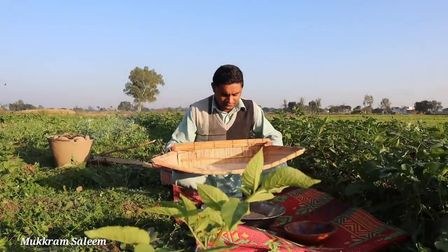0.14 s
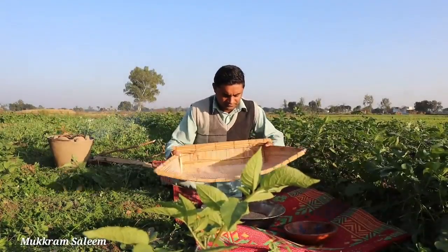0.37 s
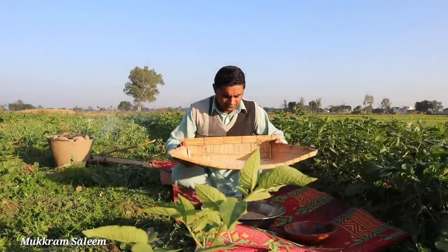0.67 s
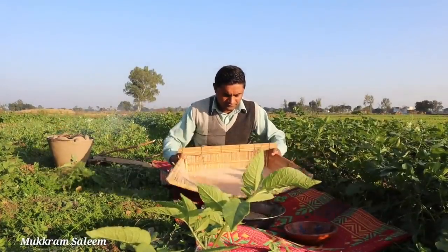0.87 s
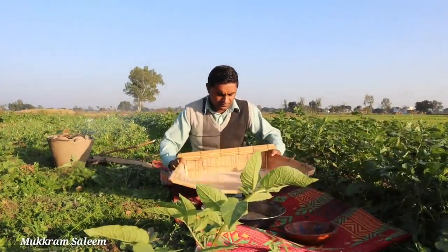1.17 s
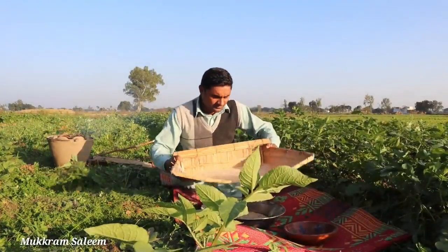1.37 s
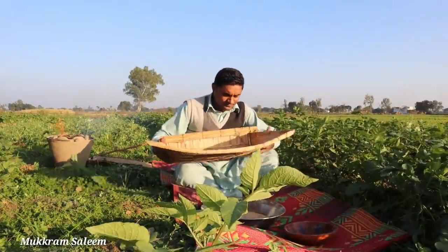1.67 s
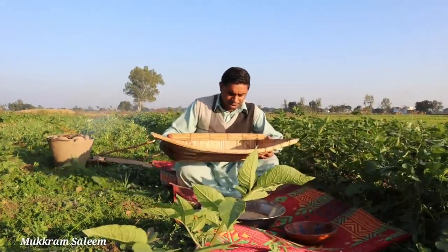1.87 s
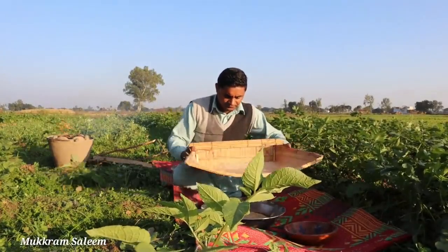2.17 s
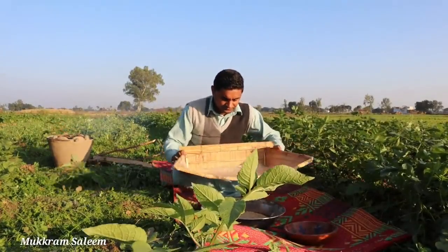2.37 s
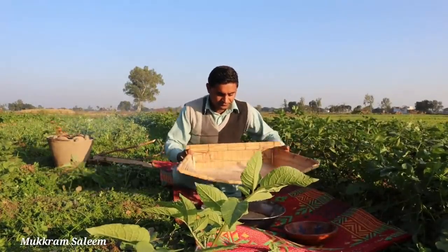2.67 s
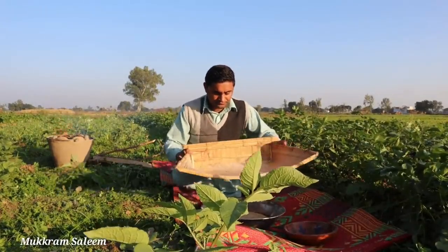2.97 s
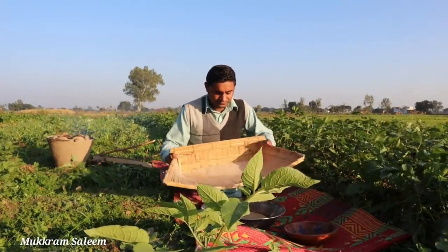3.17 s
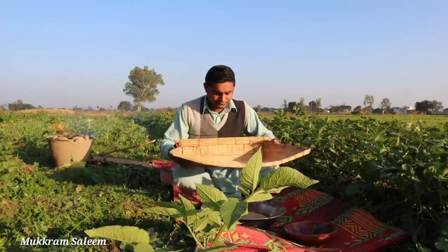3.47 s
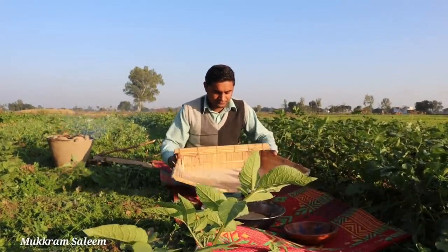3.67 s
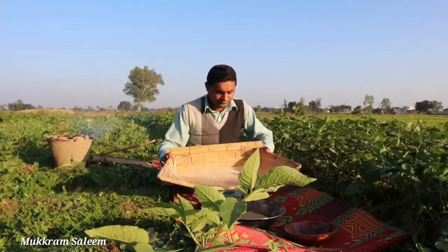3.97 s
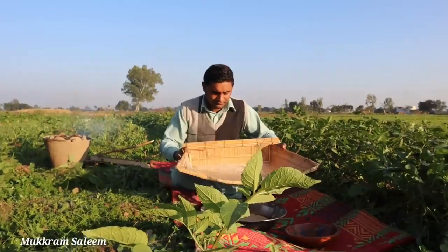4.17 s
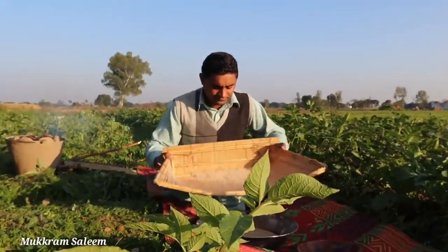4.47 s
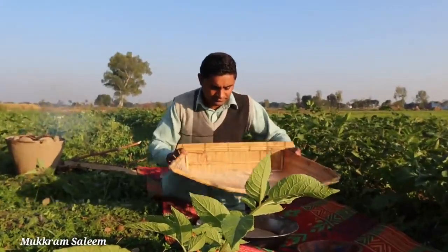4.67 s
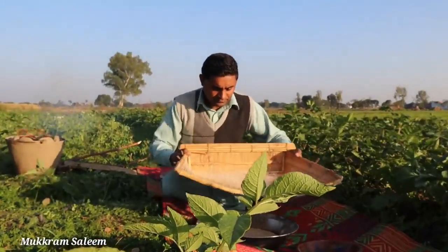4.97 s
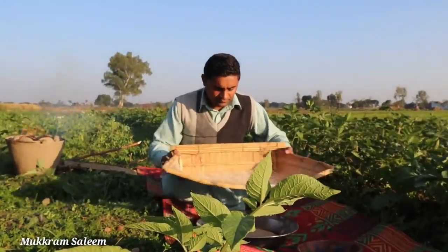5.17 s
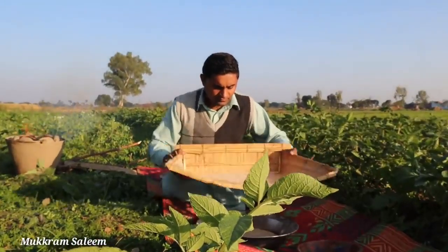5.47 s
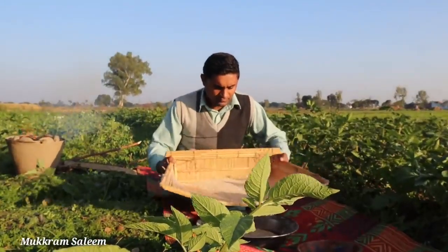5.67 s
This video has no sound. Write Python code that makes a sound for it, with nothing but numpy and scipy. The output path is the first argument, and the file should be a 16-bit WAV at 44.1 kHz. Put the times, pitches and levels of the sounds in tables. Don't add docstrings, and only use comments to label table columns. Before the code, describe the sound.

Close up in an open field, coarse grain slides to and fro in a woven tray, about seven brisk hissing strokes a second. Knuckles tap, then the shaking stops for a sharp flat-handed slap and scattered kernel clicks. It resumes, pauses for two softer slaps, and finishes with the strongest shaking. Wind thumps a single microphone; leaves rustle faintly and far birds peep.

```python
import sys
import numpy as np
from scipy import signal
from scipy.fft import rfft, irfft, next_fast_len
from scipy.io import wavfile
from scipy.ndimage import uniform_filter1d

SR = 44100
rng = np.random.default_rng(int(sys.argv[2]) if len(sys.argv) > 2 else 0)


def voltage_ratio(level):
    return 10 ** (np.asarray(level, float) / 20)


def to_wav(s):
    ch = np.atleast_2d(s).T
    pcm = np.round(np.clip(ch, -1, 1) * 32767)
    wavfile.write(sys.argv[1], SR, pcm.astype(np.int16))


N = 257086


def unit(x):
    return x / np.sqrt(np.mean(x ** 2))


def peak(x):
    return x / np.abs(x).max()


def smooth_twice(x, span):
    return uniform_filter1d(uniform_filter1d(x, span), span)


def colour(x, shape, causal=False):
    hz, db = np.transpose(shape)
    size = 2 * next_fast_len(N // 2 + 1)
    f = np.arange(size // 2 + 1) * SR / size + 1
    gain = voltage_ratio(np.interp(np.log(f), np.log(hz), db, left=-90, right=-90))
    if causal:
        cepstrum = irfft(np.log(gain), size)
        cepstrum[1:size // 2] *= 2
        cepstrum[size // 2 + 1:] = 0
        gain = np.exp(rfft(cepstrum))
    return unit(irfft(rfft(x, size) * gain, size)[:N])


def ring(x, hz, t60):
    pole = np.exp(2j * np.pi * hz / SR - np.log(1000) / (t60 * SR))
    return signal.lfilter([1], [1, -pole], x + 0j).imag


def walk(rate):
    hold = int(SR / rate)
    steps = np.repeat(rng.standard_normal(N // hold + 1), hold)
    return unit(smooth_twice(steps, hold)[:N])


def both(a_db, b_db):
    return 10 * np.log10(voltage_ratio(a_db) ** 2 + voltage_ratio(b_db) ** 2)


def swells(s, peak_db, rise_s, fall_s, bend=1):
    t = np.arange(0, N + 32, 32) / SR
    power = 1e-9
    for at, db, up, down in np.broadcast(s, peak_db, rise_s, fall_s):
        away = np.maximum(at - t, 0) / max(up, .002) + np.maximum(t - at, 0) / max(down, .002)
        power = power + voltage_ratio(db - 10 * away ** bend) ** 2
    return np.interp(np.arange(N) / SR, t, 10 * np.log10(power))


# frequency in Hz, density in dB per Hz.
FIELD_COLOUR = [(18, -37), (30, -14.5), (69, -2), (208, -16), (341, -3.5), (898, -14.5), (1230, -7.5),
                (1770, -14), (3780, -18), (4540, -21), (15500, -33.5)]


def field():
    return colour(rng.standard_normal(N), FIELD_COLOUR) * voltage_ratio(-48.4 + 1.6 * walk(4.4))


# frequency in Hz, density in dB per Hz.
EDDY_COLOURS = [
    [(15, 5), (30, -0.5), (60, 5.5), (85, 1), (100, -17)],
    [(70, -30), (90, 1.5), (125, 2.5), (160, -10.5), (190, -52)],
    [(135, -13), (165, 3), (220, -2.5), (300, -7.5), (500, -25)],
]
CALM_DB = (-53, -55, -55.5)
# peak time in seconds, peak in dB, rise in seconds per 10 dB, fall in seconds per 10 dB.
LARGE_GUSTS = [(0.071, -38.5, -0.1, 0.009), (0.524, -17.7, 0.012, 0.07), (0.834, -43, 0.326, 0),
               (1.615, -45, 0.224, -0.1), (2.686, -37.2, 0.016, 0.099), (2.951, -23, 0.05, 0.058),
               (3.073, -32.5, 0.004, 0.05), (3.149, -30.5, 0.014, 0.063), (3.527, -69, 0.384, 0.014),
               (3.705, -25.5, 0.1, 0.022), (3.923, -23.5, 0.1, 0.04), (3.983, -32.5, 0.1, 0.051),
               (4.094, -29, 0.013, 0.016), (4.254, -34.3, 0.108, 0.01), (4.302, -27, 0.022, 0.076),
               (4.441, -29, 0.023, 0.08), (4.624, -37, 0.022, 0.036), (4.74, -44, 0.053, 0),
               (4.869, -28.4, 0.03, 0.1), (5.194, -39.1, -0.05, 0.172), (5.434, -35.6, 0.208, 0.06)]
MIDDLE_GUSTS = [(0.053, -43.8, 0.032, 0.156), (0.403, -45.3, 0.12, 0.069), (0.521, -34, 0.008, 0.063),
                (0.809, -29, 0.019, 0.008), (0.89, -43.9, 0.109, 0.173), (1.614, -41.4, 0.027, 0.032),
                (1.89, -45.4, 0.079, 0.097), (2.39, -47.5, 0.149, 0.191), (2.686, -40.5, 0.032, 0.09),
                (2.953, -38, 0.024, 0.038), (3.168, -32.5, 0.066, 0.047), (3.492, -36, 0.015, 0.085),
                (3.616, -22.5, 0.034, 0.021), (3.652, -22, 0.0074, 0.012), (3.678, -20, 0.016, 0.025),
                (3.708, -25, 0.012, 0.015), (3.813, -21.5, 0.008, 0.03), (3.832, -20, 0.02, 0.017),
                (3.865, -30.5, 0.02, 0.05), (4.059, -30.5, 0.035, 0.062), (4.3, -22.5, 0.044, 0.025),
                (4.407, -32.2, 0.079, 0.004), (4.464, -27.7, 0.029, 0.082), (4.797, -33, 0.018, 0.106),
                (4.911, -37.1, 0.051, 0.013), (5.21, -48.4, 0.478, 0.53), (5.542, -36.5, 0.212, 0.03)]
SMALL_GUSTS = [(0.34, -49.5, 0.364, 0.36), (0.801, -43.5, 0.016, 0.071), (0.923, -32.1, 0.013, 0.021),
               (1.016, -42.2, 0.017, 0.017), (1.864, -42, 0.004, 0.041), (2.014, -44, 0.035, 0.004),
               (2.458, -40.5, 0.065, 0.009), (2.904, -47, 0.017, 0.207), (3.529, -54, 0.568, 0.008),
               (3.672, -24.6, 0.075, 0.015), (3.817, -31.9, 0.057, 0.034), (3.949, -48.5, 0.007, 0.075),
               (4.044, -37.5, 0.012, 0.046), (4.389, -47, 0.255, 0.517), (4.804, -27, 0.01, 0.069),
               (4.885, -48.1, 0.024, 0.6), (5.472, -50, 0.548, 0.312)]


def wind():
    out = 0
    gusts = LARGE_GUSTS, MIDDLE_GUSTS, SMALL_GUSTS
    for rows, calm_db, shape, span_s in zip(gusts, CALM_DB, EDDY_COLOURS, (.06, .035, .022)):
        swirl = colour(rng.standard_normal(N), shape)
        swing = np.sqrt(smooth_twice(swirl ** 2, int(span_s * SR)))
        steady = unit(swirl / swing ** .7)
        level_db = both(swells(*np.transpose(rows)), calm_db + 3 * walk(8))
        out = out + voltage_ratio(level_db) * steady
    crests = out ** 2 - uniform_filter1d(out ** 2, SR // 40)
    return out + 1.2 * crests


# time in seconds, rattle in dB, time to sink 10 dB in seconds.
SHAKE_STROKES = [(0.062, -32, 0.0769), (0.19, -33.5, 0.06), (0.303, -33, 0.06), (0.427, -32.5, 0.07),
                 (0.531, -33.5, 0.056), (0.651, -37, 0.0834), (2.334, -34, 0.0827), (2.483, -34, 0.0675),
                 (2.624, -35.5, 0.076), (2.769, -32.5, 0.07), (2.904, -32, 0.07), (3.054, -32.5, 0.09),
                 (3.183, -33.5, 0.0739), (3.304, -33, 0.0634), (3.393, -37, 0.107), (4.332, -33, 0.0832),
                 (4.472, -31.5, 0.08), (4.607, -31, 0.0746), (4.744, -29.5, 0.0732), (4.875, -31, 0.0651),
                 (5.008, -29.5, 0.0634), (5.137, -28.5, 0.0642), (5.27, -30, 0.0559), (5.398, -30.0, 0.059),
                 (5.527, -31, 0.069), (5.655, -31.5, 0.064), (5.774, -34.5, 0.12)]
# time in seconds, rattle in dB,
# rise in seconds per 10 dB, fall in seconds per 10 dB, chaff over its usual level in dB.
LOOSE_SLIDES = [(0.787, -45, -0.2, 0.07, -1), (0.955, -34.8, 0.06, 0.067, 1.0),
                (1.011, -38.5, 0.1, 0.048, -0.7), (1.12, -48, 0, 0.066, -5),
                (1.271, -38.5, 0.035, 0.052, -0.4), (1.434, -52.5, 0, 0.1, 5),
                (1.556, -50.5, -0.06, 0.2, -6.7), (1.629, -46.0, 0.012, 0.139, 1.9),
                (1.714, -39, 0.076, 0.028, 2), (1.807, -46.0, 0.107, 0, -2.1),
                (1.868, -45.5, 0.015, 0.164, -0.2), (1.917, -51, 0.016, 0.036, 1.5),
                (2.053, -44.3, -0.03, 0.02, -5.8), (2.12, -41.6, -0.01, 0.17, -4),
                (2.163, -44.5, 0.02, 0.16, 4.5), (3.574, -44.0, 0, 0.03, 0), (3.63, -48, 0.3, 0.195, -0.5),
                (3.758, -29.5, 0.03, 0.04, 1.5), (3.853, -45.5, -0.1, 0.097, -2),
                (3.975, -50.0, -0.1, 0, 2), (4.051, -41, -0.02, 0.4, -0.6), (4.148, -42, 0.02, -0.3, 1.3)]
# time in seconds, thrum in dB, reed ring in dB, length in seconds per 10 dB.
SLUMPING_CLUMPS = [(0.067, -40, -46.5, 0.07), (0.556, -34, -38, 0.03), (0.8, -49, -36, -0.06),
                   (0.921, -33, -32.5, 0.02), (1.025, -42, -39, 0.01), (1.27, -38, -36, -0.02),
                   (1.7, -41.5, -41, 0.04), (1.874, -46, -55, -0.06), (2.586, -39, -53, 0),
                   (2.64, -55, -37.5, 0), (2.74, -51, -39, -0.01), (3.364, -52, -35, 0.02),
                   (3.44, -51, -36, 0.03), (3.565, -42, -37.5, 0.03), (3.657, -37.5, -42, 0.09),
                   (3.814, -40, -62, 0.07), (4.274, -41, -44, .025), (4.328, -37.5, -31, 0.0457),
                   (4.489, -41, -35, 0.06), (4.772, -40, -43, 0.12), (4.916, -47, -50, 0.27),
                   (5.01, -48, -34, 0.1), (5.532, -42.5, -41, 0.1)]


def motion():
    s, db, width = np.transpose(SHAKE_STROKES)
    shaken = swells(s, db + 1.5, .97 * width, width, bend=2.2)
    s, db, rise, fall, chaffy_db = np.transpose(LOOSE_SLIDES)
    rattle_db = both(shaken, swells(s, db, rise, fall))
    chaff_drive_db = both(shaken, swells(s, db + chaffy_db, rise, fall))
    chaff_db = -36.4 + 1.03 * (chaff_drive_db + 31.5)
    push = uniform_filter1d(rattle_db, int(.026 * SR)) + 32.5
    s, floor_db, cane_db, length = np.transpose(SLUMPING_CLUMPS)
    reed_db = both(-36 + .85 * push, swells(s, cane_db, length, length))
    thrum_db = both(-45.5 + .61 * push, swells(s, floor_db, length, length))
    return chaff_db, rattle_db, reed_db, thrum_db


def kernels(per_s, spread_db, hiss):
    when, size, sign = rng.random((3, N))
    ticks = (when < per_s / SR) * voltage_ratio(-spread_db * np.log(size + .05)) * np.sign(sign - .5)
    return unit(ticks) + hiss * rng.standard_normal(N)


# frequency in Hz, density in dB per Hz.
RATTLE_COLOUR = [(1500, -70), (1850, -12), (2600, -3.5), (3550, -0.5), (4100, -2.5), (4550, -16),
                 (4800, -11.5), (5300, -26.5)]
CHAFF_COLOUR = [(4500, -43), (5200, -10.5), (6200, -6), (7500, -3), (10000, -5), (12500, -14.5),
                (15500, -22.5), (17000, -40)]
REED_COLOUR = [(700, -14), (900, -8.5), (1300, -1), (1560, 0), (1720, -6), (1900, -14.5), (2300, -16)]
THRUM_COLOUR = [(150, -35), (260, -4.5), (360, 0.5), (600, 1.5), (870, -9.5), (1100, -14)]


def grain():
    chaff_db, rattle_db, reed_db, thrum_db = motion()
    coarse = kernels(per_s=5000, spread_db=2, hiss=1.3)
    fine = kernels(per_s=9000, spread_db=2, hiss=1.3)
    heavy = coarse + 1.1 * kernels(per_s=140, spread_db=3, hiss=0)
    rattle = voltage_ratio(rattle_db) * colour(coarse, RATTLE_COLOUR, causal=True)
    chaff = voltage_ratio(chaff_db) * colour(fine + .5 * coarse, CHAFF_COLOUR, causal=True)
    reeds = voltage_ratio(reed_db + 1.25 * walk(30.01)) * colour(heavy + coarse, REED_COLOUR, causal=True)
    thrum = voltage_ratio(thrum_db + 1.3 * walk(25.01)) * colour(heavy, THRUM_COLOUR, causal=True)
    return (rattle + chaff + reeds + thrum) * voltage_ratio(.91 * walk(60))


# frequency in Hz, level in dB, decay by 60 dB in seconds.
TRAY_MODES = [(355, -9, 0.013), (726, -10, 0.043), (1000, 5.5, 0.0062), (1520, 3, 0.024)]
CRACK_MODES = [(2400, -6.5, 0.012), (3030, -2.5, 0.0061), (3600, 3.5, 0.0073), (4030, -7.5, 0.009),
               (7450, -1.5, 0.0023)]


def struck_tray(blows):
    size = 2048
    out, t = np.zeros(N + size), np.arange(size) / SR
    air = signal.butter(2, 11000, fs=SR, output="sos")
    soft = signal.butter(2, 6000, fs=SR, output="sos")
    for s, peak_db, hz, crack_db, share in blows:
        share = max(share, .15)
        noise = rng.standard_normal(size)
        push = np.sin(np.pi * np.clip(t * hz * 2, 0, 1)) ** 2
        scrape = .15 * noise * np.exp(-t / .002)
        body = peak(ring(push + scrape, hz, .024 * share))
        for f, db, t60 in TRAY_MODES:
            distance_db = 2.7 * abs(np.log2(f / hz))
            body = body + voltage_ratio(db - 9 - distance_db) * peak(ring(push, f, t60 * share))
        if hz < 2000:
            body = signal.sosfilt(soft, body)
        burst = noise * t * np.exp(-t / .001)
        crack = sum(voltage_ratio(db) * ring(burst, f, t60) for f, db, t60 in CRACK_MODES)
        crack = peak(signal.sosfilt(air, crack))
        i = int(s * SR)
        out[i:i + size] += voltage_ratio(peak_db) * (peak(body) + voltage_ratio(crack_db) * crack)
    return signal.sosfilt(signal.butter(2, 240, "high", fs=SR, output="sos"), out[:N])


# time in seconds, peak in dB,
# strongest ring in Hz, crack over ring in dB, decay as a share of the usual.
TAPS = [(.226, -20, 1120, -14, .95), (.337, -18, 1500, -12.5, 0.15), (.456, -19, 1140, -10, 1.4),
        (.549, -29, 494, -14, .67), (.791, -29, 706, -20, 0.84), (.802, -25, 685, -14, 1.1),
        (.9165, -15, 513, -16, 0.25), (.9605, -15.5, 1500, -10, .26), (1.162, -33, 900, -3.5, .7),
        (1.478, -26, 1200, -27, 0.9), (1.559, -27, 660, -9, .67), (1.785, -27, 1180, -14, 1.1),
        (1.860, -27, 930, -6, .7), (1.880, -26.5, 1250, -9, 0.55), (1.908, -27.5, 920, -5, .55),
        (2.103, -35, 1240, -9, .6), (3.3585, -16, 1430, -5, 0.73), (4.684, -16, 1000, -18, .23),
        (5.577, -22, 603, -6, .44), (5.605, -18.5, 1200, -23, 0.77)]


def taps():
    return struck_tray(TAPS)


# time in seconds, peak in dB, # strongest ring in Hz, crack
# over ring in dB, decay as a share of the usual.
KERNEL_TICKS = [(.3686, -24, 3450, -2, .5), (.9353, -28, 3240, -4, .5), (1.1194, -40, 3010, -4, .5),
                (1.4027, -39, 3790, -4, .5), (1.6184, -42, 3380, -4, .5), (1.6257, -39, 4040, -4, .5),
                (1.7863, -40, 2700, -4, .5), (1.8647, -37, 3430, -4, .5), (1.9899, -39, 2770, -4, .5),
                (2.0477, -37, 3200, -4, .5), (2.1046, -35, 3550, -4, .5), (2.7062, -28, 3280, -4, .5),
                (2.9931, -26, 3700, -4, .5), (3.7344, -32, 1400, -6, .6), (3.9464, -42, 3510, -4, .5),
                (4.2373, -31, 3780, -5, .5), (4.2542, -31, 3870, -4, .5), (4.4084, -22, 3180, -4, .5),
                (4.9501, -25, 3890, -4, .5), (5.0379, -21, 3930, -3.5, .5), (5.7344, -25, 3670, -4, .5),
                (1.7105, -33, 2740, -10, .7), (3.556, -25, 1280, -20, 0.87), (3.596, -25, 650, -20, .6),
                (3.668, -25, 950, -20, .5)]


def kernel_ticks():
    return struck_tray(KERNEL_TICKS)


# time in seconds, peak in dB, # strongest ring in Hz, crack over
# ring in dB, decay as a share of the usual.
STRAY_KERNELS = [(.8035, -36, 9000, -10, .2), (.908, -25, 2400, -6, .5), (1.427, -39, 7050, -4, .35),
                 (1.436, -39, 3840, 0, .5), (1.712, -28, 3600, 2, .6), (1.934, -32, 4120, -1, .8),
                 (2.0572, -35, 8540, -12, .15), (2.121, -30, 10000, -8, .2), (3.554, -27, 2400, -10, .8),
                 (3.56, -21.5, 2300, -6, .79), (3.819, -26, 4070, -5, 0.71), (3.870, -34, 4220, 2, .8),
                 (3.912, -38, 4000, 4, 0.54), (3.975, -38, 3600, 0.5, .4)]


def stray_kernels():
    return struck_tray(STRAY_KERNELS)


# time in seconds,
# peak in dB, strongest ring in Hz, crack over ring in dB, decay as a share of the usual.
FINGER_BLOWS = [(1.2419, -19.5, 3700, 2, 0.84), (1.2442, 1.5, 1000, -17, 0.38), (1.2456, -9, 369, -15, 1.5),
                (1.2558, -24, 1520, 1, 0.56), (1.2564, -9, 1520, -17.5, 0.45),
                (1.258, -14.5, 352, -22, 0.91), (3.7467, -18.5, 3470, -1, 0.77),
                (3.7485, -11.5, 655, -19, 0.78), (3.7535, -15, 430, -6, 2.7),
                (3.7575, -8.5, 1610, -10, 0.38), (3.7602, -10, 644, -17, 0.6),
                (4.0447, -21, 1530, -2, 0.57), (4.048, -10, 1560, -12, 0.58), (4.0496, -10, 640, -25, 0.89),
                (4.0533, -9, 1550, -10, 0.57), (4.055, -9, 440, -21, 0.33), (1.243, -29, 8500, -6, .4),
                (1.2505, -19, 1150, -6, .6)]


def slaps():
    return struck_tray(FINGER_BLOWS)


# time in seconds, peak in dB, strongest ring in
# # Hz, crack over ring in dB, decay as a share of the usual.
MORE_FINGER_BLOWS = [(1.2457, -6, 1490, -20, 0.47), (1.2551, -17, 1500, -15, .4), (1.2571, -8.5, 1550, -20, .4),
                (1.269, -25, 400, -8, 1), (3.7521, -19, 1450, -10, .5), (3.7562, -17, 1550, -15, 0.35),
                (3.7581, -10, 1600, -8, 0.4), (3.7685, -22, 600, -5, 0.7), (3.772, -24, 1500, -10, .8),
                (3.781, -24, 1300, -15, .6), (4.046, -18, 1550, -10, .4), (4.0493, -8.5, 1570, -19, 0.39),
                (4.0547, -11, 1560, -12, .45), (4.0585, -22, 450, -10, .6),
                (4.051, -15, 1050, -15, .6),
    (3.7594, -14, 600, -15, .5),
    (4.0572, -17, 1100, -12, .6),
]


def more_finger_blows():
    return struck_tray(MORE_FINGER_BLOWS)


# start in seconds, length in seconds, start in Hz, end in Hz, level in dB.
BIRD_PEEPS = [
    (1.530, .068, 2340, 2080, -50),
    (1.722, .05, 5200, 5050, -57),
    (3.853, .045, 4700, 4600, -57),
]


def birds():
    out, t = 0, np.arange(N) / SR
    for s, length, start_hz, end_hz, db in BIRD_PEEPS:
        u = np.clip((t - s) / length, 0, 1)
        phase = 2 * np.pi * np.cumsum(start_hz + (end_hz - start_hz) * u) / SR
        out = out + voltage_ratio(db) * np.sin(np.pi * u) * np.sin(phase)
    return out * voltage_ratio(4.7 * walk(100))


def scene():
    mono = field() + wind() + grain()
    mono = mono + taps() + kernel_ticks() + stray_kernels() + slaps() + more_finger_blows() + birds()
    return np.array([mono, mono])


def band_limit(x):
    return signal.sosfilt(signal.butter(12, 15660, fs=SR, output="sos"), x)


def record(dry):
    hiss = voltage_ratio(-76) * rng.standard_normal(N) * np.array([[1], [-1]])
    low_pass = signal.ellip(10, .2, 80, 15450, fs=SR, output="sos")
    return band_limit(signal.sosfilt(low_pass, dry + hiss))


dry = scene()
out = record(dry)
to_wav(out)
```